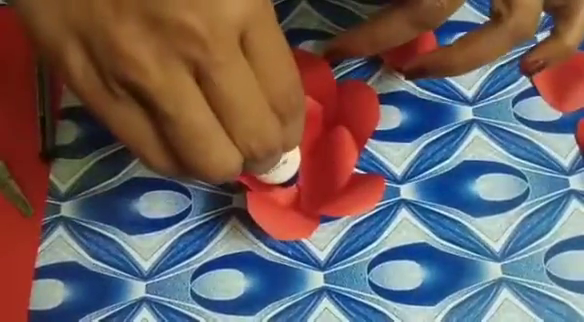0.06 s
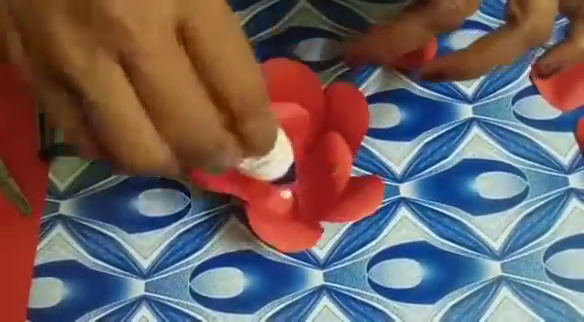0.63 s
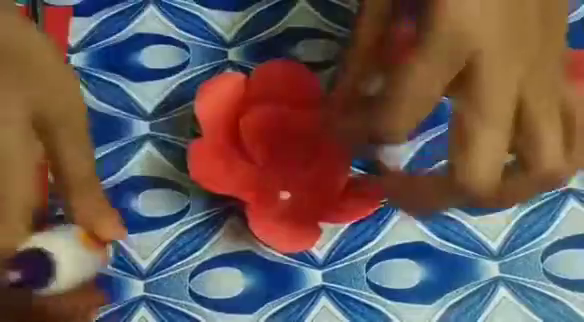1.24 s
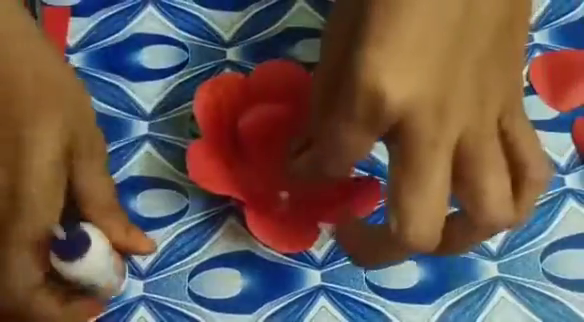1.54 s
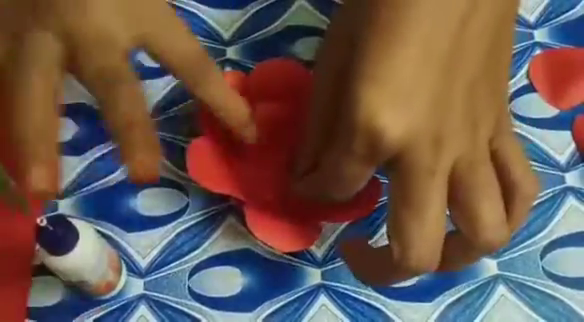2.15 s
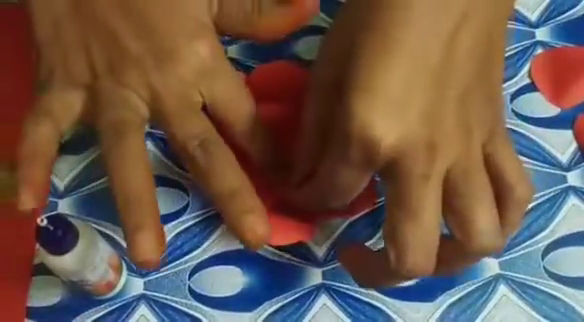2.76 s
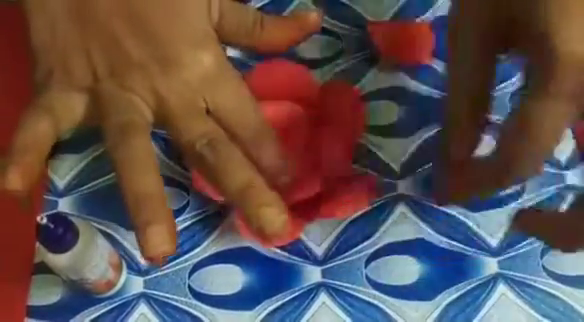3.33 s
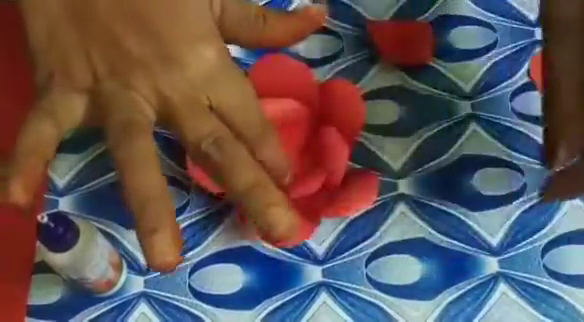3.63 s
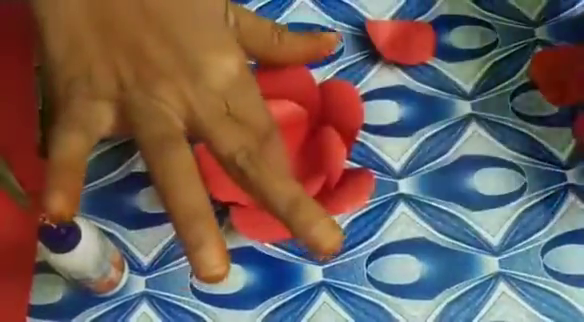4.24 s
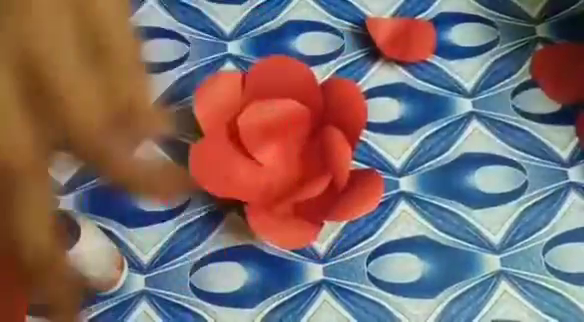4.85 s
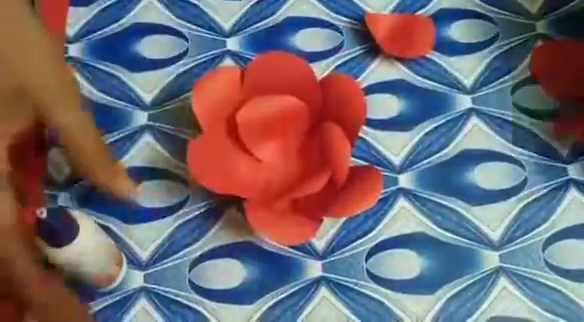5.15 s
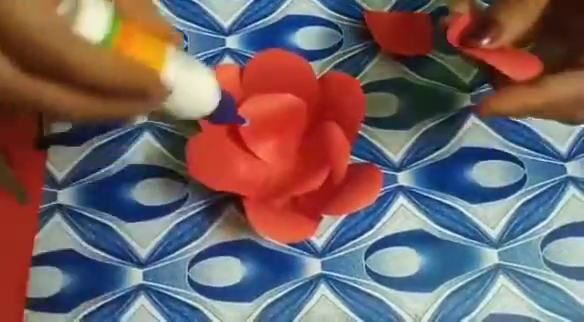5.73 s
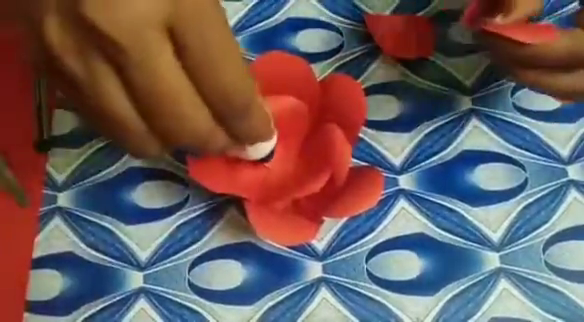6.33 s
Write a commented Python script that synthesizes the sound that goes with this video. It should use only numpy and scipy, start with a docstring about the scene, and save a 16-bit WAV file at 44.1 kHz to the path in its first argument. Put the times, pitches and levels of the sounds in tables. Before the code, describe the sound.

A fan hums and a muffled engine outside swells and fades beneath quiet, close paper handling in a small room. A few crisp ticks come first, then a plastic glue bottle lands on the table with a short, hollow knock. Soft fingertip hiss and scattered crackles follow, with one sharper paper snap midway. Near the end the bottle gives a faint scrape and bump, and the paper crackles again.

```python
"""Paper ticks, slides and flicks as hands glue petals into a flower on a cloth-covered table.
Friction makes the swishes and hiss; creases snap as they give way. A plastic glue bottle is stood
down, ringing the modes of the table top, and later scrapes as it is picked up. A fan hums in the
small room, and an engine far outside throbs through the walls as its throttle opens and shuts."""
import sys
import numpy as np
from scipy import signal
from scipy.fft import rfft, irfft, next_fast_len
from scipy.io import wavfile
from scipy.ndimage import uniform_filter1d, map_coordinates

SR = 44100
rng = np.random.default_rng(int(sys.argv[2]) if len(sys.argv) > 2 else 0)


def log_audio(samples):
    """Write samples as a 16-bit WAV file to the path given in sys.argv[1]."""
    # one column per channel
    frames = np.atleast_2d(samples).T
    # limit to full scale, then quantise
    limited = np.clip(frames, -1, 1)
    pcm = np.round(limited * 32767).astype(np.int16)
    wavfile.write(sys.argv[1], SR, pcm)


N = 281799

SLIP_ATTACK = 0.38  # share of a slip's length spent rising


def paper(swish_db=-3, settle_db=-10.5, settle_s=0.081, tick_t60_s=0.013, snap_low_hz=1800, wet_db=-18):
    """Stick-slip friction and buckling: paper swishes, the landing bottle scuffs and creases snap."""
    # short swishes of paper, and one dull scuff as the bottle lands:
    # start_s, length_s, level_db, tilt_db_per_octave
    swishes = [(0.343, 0.06, -54, 2), (0.396, 0.052, -41, 1.5), (0.53, 0.038, -42, 3),
               (0.567, 0.0086, -36, 1), (0.585, 0.006, -23.5, 2), (0.592, 0.025, -38, 0),
               (0.631, 0.028, -33.5, 1), (1.05, 0.016, -38.5, 0), (1.187, 0.03, -43, 6),
               (1.588, 0.015, -41, -8.5), (2.872, 0.14, -39.5, -1.5), (3.021, 0.041, -30, 2),
               (3.048, 0.028, -22.5, -.5), (3.063, 0.0091, -16.5, -1), (3.594, 0.016, -25.5, 6.5),
               (3.759, 0.025, -32.5, 2), (3.779, 0.029, -25, 1.5), (3.824, 0.052, -40, -0.5),
               (4.105, 0.0089, -37, -1), (4.667, 0.024, -29.5, 1.5), (5.191, 0.012, -40, 15),
               (5.274, 0.035, -36.5, 9), (5.416, 0.035, -39.5, 5), (5.464, 0.031, -35, 5),
               (5.851, 0.035, -24, 2.5), (5.884, 0.033, -24.5, 0.5), (5.934, 0.051, -37.5, 4)]
    # creases snapping and nails touching: start_s, level_db, tilt_db_per_octave
    ticks = [(0.25, -37, -1), (0.439, -29, -1.5), (0.4475, -28.5, -3), (.5868, -16, -1), (.5898, -14, 0),
             (0.633, -29, 4), (0.648, -26, 4), (0.7835, -35, -1.5), (.8062, -37, 0), (1.5846, -25.5, -7.5),
             (2.927, -31, -3), (3.0665, -21, -8), (3.0686, -23.5, -7), (3.401, -34, -2), (3.457, -30.5, 12),
             (3.774, -27, -1), (3.8893, -30.5, -1), (4.5186, -33, 0), (4.655, -20, 6.5), (4.682, -23.5, 0),
             (5.1878, -41, 12), (5.8503, -16, 3), (5.903, -20, 12), (5.917, -37, 9)]
    # spectrum of the paper: frequency_hz, left_db, right_db
    spectrum = [(250, -28, -40), (710, -13, -13.5), (1060, -9, -22.5), (1880, -13.5, -17),
                (2620, -20, -5.5), (3420, -5.5, -12), (3950, -3.5, -11.5), (5080, -14, -19.5),
                (5880, -9, -14), (7450, 3.5, -7), (8230, -1.5, 1), (10600, -7.5, -12.5), (11300, -3, -26),
                (12800, -3.5, -25), (14400, 2.5, -25), (14900, -3.5, -21), (15900, 2, -32)]
    t, close = np.arange(SR) / SR, np.zeros((2, N))
    for start, length, db, tilt in swishes:
        push = envelope(t, length, SLIP_ATTACK * length, release=length)
        settle = amp(settle_db) * envelope(t, length, SLIP_ATTACK * length, settle_s)
        gain = amp(db + swish_db) * np.maximum(push, settle)
        fibres = friction(tilt, grain_db=0.3, grains_per_s=810)
        slip = gain * fibres * crinkle(jump_db=4, creases_per_s=260, life_s=0.0013)
        add(close, start, scattered(slip, share=0.55, spread_s=0.00095))
    # stiff paper radiates little bass when it snaps
    highpass = signal.butter(2, snap_low_hz, 'highpass', fs=SR, output='sos')
    for start, db, tilt in ticks:
        fibres = friction(tilt, grain_db=0.5, grains_per_s=450)
        snap = signal.sosfilt(highpass, decay(t, db, tick_t60_s) * fibres)
        add(close, start, snap * amp([[0], [-5]]))  # the snaps face left
    return coloured(close + amp(wet_db) * reverb(close, channels=2), spectrum)


def rasping():
    """Stick-slip friction: cut edges catch on the paper's grain with a dry midrange crackle."""
    # one petal dragging over another: start_s, length_s, level_db
    rasps = [(0.429, 0.021, -54), (0.599, 0.057, -53), (2.928, 0.04, -48), (3.043, 0.012, -41),
             (3.596, 0.015, -45.5), (3.77, 0.043, -44.5), (4.667, 0.016, -48)]
    # spectrum of the rasp: frequency_hz, left_db, right_db
    spectrum = [(900, -28, -25), (1700, -13, 3), (2800, -4, -5), (4240, 8, -4), (5200, -6, 2),
                (5700, 1, -3), (7000, -22, -24)]
    t, gain = np.arange(SR) / SR, np.zeros(N)
    for start, length, db in rasps:
        drag = amp(db) * envelope(t, length, SLIP_ATTACK * length, release=0.086)
        add(gain, start, drag * crinkle(jump_db=7, creases_per_s=420, life_s=0.00057))
    return coloured(gain * rng.standard_normal((2, N)), spectrum)


def petal_spring(attack_s=0.0018, click_t60_s=0.0033):
    """Snap-through: a pressed, curved petal pops back with a click and rings briefly in its modes."""
    # the petal springing free: start_s, level_db
    pops = [(3.0665, -21.5)]
    # modes of the petal: pitch_hz, level_db, t60_s
    modes = [(3600, -1.5, 0.069), (4430, 5.5, 0.045), (7700, -18, 0.036), (8950, 4, 0.031),
             (12000, 2, 0.028)]
    t, track = np.arange(SR // 5) / SR, np.zeros((2, N))
    for start, db in pops:
        ring = sum(decay(t, level, t60) * np.sin(2 * np.pi * (hz * t + rng.random((2, 1))))
                   for hz, level, t60 in modes)
        click = decay(t, -20, click_t60_s) * rng.standard_normal((2, len(t)))
        add(track, start, amp(db) * (ring * (1 - np.exp(-t / attack_s)) + click))
    return track * amp([[0], [-9]])


def sliding(slide_db=3, catch_db=0.9, resting_db=-74, swell_db=4.5):
    """Sliding friction: fingertips hiss and catch on the petals, pressing harder through each stroke."""
    # fingertip strokes: start_s, length_s, end_level_db
    strokes = [(0.475, 0.21, -57), (1.206, .22, -56.5), (2.146, 0.64, -54.5), (2.787, 0.29, -48.5),
               (3.352, 0.12, -54), (4.04, 0.65, -55), (4.91, 0.14, -54.5), (5.15, 0.1, -53),
               (5.386, 0.31, -51), (6.22, .17, -67)]
    # spectrum of skin on paper: frequency_hz, left_db, right_db
    spectrum = [(1000, -35, -34), (2500, -9.5, -19), (4220, -3.5, -29), (4960, -24, -33), (7170, 2, -4.5),
                (8350, 1, 0), (10400, -4, -9.5), (11900, 0, -47), (15200, 3, -24), (15800, -15, -24)]
    t, gain = np.arange(N) / SR, amp(resting_db)
    for start, length, db in strokes:
        remaining = np.clip(1 - (t - start) / length, 0, 1)
        contact = envelope(t - start, length, attack=0.4 * length, release=0.14)
        gain = gain + amp(db - swell_db * remaining) * contact
    skin = patchy(drift_db=2.0)
    seconds = [crinkle(jump_db=0, creases_per_s=120, life_s=0.0007) for _ in range(N // SR + 1)]
    crackle = np.concatenate(seconds)[:N]
    catching = amp(slide_db + catch_db * (wobble(14) + wobble(60)))
    return gain * catching * coloured(crackle * skin, spectrum)


def knocks(contact_s=0.0004, clunk_db=-22, clunk_t60_s=0.2, wet_db=-16, wide_db=-26):
    """Impact excites damped modes: the bottle's foot clacks, the table rings and the walls reflect it."""
    # bottle and hands meeting the table: start_s, level_db
    blows = [(1.5842, -10), (3.034, -34), (3.0661, -40), (4.691, -41), (5.345, -31.5)]
    # modes of the table top: pitch_hz, level_db, t60_s
    table_modes = [(188.5, -15.5, 0.41), (240.7, -0.5, 0.11), (276.3, -9, 0.27), (286, -31, 0.23),
                   (310, -4, 0.15), (351, -26, 0.2), (450, -36, 0.27), (523, -21.5, 0.11), (584, -37, 0.21),
                   (713, -34, 0.096), (846, -38, 0.14)]
    # modes of the hollow plastic foot: pitch_hz, level_db, t60_s
    foot_modes = [(564, -6.5, 0.009), (970, -17.5, 0.0094), (1340, -21, 0.0083)]
    # dense, short-lived modes of bottle and table: frequency_hz, level_db
    dense_modes = [(120, -30), (200, 10), (300, -13), (420, 3.5), (700, -5), (950, -14), (1450, -18),
                   (1900, -45), (5000, -39)]
    # reflections from nearby walls: delay_s, level_db
    walls = [(0.0771, -19), (0.111, -19), (0.153, -26)]
    t, direct = np.arange(SR // 2) / SR, np.zeros(N)
    cushion = 1 - np.exp(-t / contact_s)  # the cloth softens the contact
    # neighbouring modes swing in opposite senses
    ring = sum((-1) ** k * decay(t, db, t60) * np.sin(2 * np.pi * hz * t)
               for k, (hz, db, t60) in enumerate(table_modes))
    clack = sum(decay(t, db, t60) * np.sin(2 * np.pi * hz * t) for hz, db, t60 in foot_modes)
    for start, db in blows:
        noise = coloured(rng.standard_normal(N), dense_modes)[0, :len(t)]
        clunk = decay(t, clunk_db, clunk_t60_s) * noise
        add(direct, start, amp(db) * (ring + clack + clunk) * cushion)
    reflections = lambda hz: sum(amp(db) * np.exp(-2j * np.pi * hz * delay) for delay, db in walls)
    room = amp(wet_db) * reverb(direct, channels=1) + amp(wide_db) * reverb(direct, channels=2)
    return direct + filtered(direct, reflections) + room


def bottle_scrape():
    """Resonance: as the bottle is gripped its foot drags, and the friction noise sounds its shell."""
    # strength of the drag: time_s, level_db
    drag = [(5.16, -98), (5.19, -47), (5.205, -57), (5.23, -58), (5.28, -90.5)]
    # resonances of the hollow shell: centre_hz, half_width_hz, level_db
    resonances = [(764, 75, -2), (3950, 75, -8)]
    shell = lambda hz: sum(amp(db) / (1 + ((hz - centre) / width) ** 2)
                           for centre, width, db in resonances)
    return amp(curve(drag)) * unit(filtered(rng.standard_normal((2, N)), shell))


def leaning():
    """Forced vibration: the table rumbles dully as a hand comes to rest on it."""
    # the hand's weight bearing down: start_s, length_s, level_db
    leans = [(1.286, 0.38, -45.5)]
    # the table's deep response: frequency_hz, level_db
    spectrum = [(25, -34), (48, -20), (63, -5), (80, 3), (110, -10), (250, -70)]
    t = np.arange(N) / SR
    gain = sum(amp(db) * envelope(t - start, length, attack=0.048, release=0.099)
               for start, length, db in leans)
    return gain * coloured(rng.standard_normal(N), spectrum)


def brushing(uneven_db=4.0):
    """Friction noise: a soft rush swells as the arms move over the cloth."""
    # strength of the brushing: time_s, level_db
    movement = [(0, -80), (.45, -78), (.85, -63), (1.4, -54.5), (1.95, -60.5), (2.4, -56), (2.95, -55),
                (3.5, -55), (4.25, -66.5), (4.6, -54), (5.1, -64), (5.55, -55.5), (6.15, -66),
                (6.39, -56.5)]
    # spectrum of rubbed cloth: frequency_hz, left_db, right_db
    spectrum = [(400, -20, -6), (880, -0.5, -3), (1500, 2, -1.5), (2700, -0.5, 1), (4000, 3, -10),
                (4480, -0.5, -8), (4770, -23.5, -22), (6240, -7, -5), (7950, -10, -16), (11000, -32, -33)]
    rush = scattered(patchy(drift_db=2.5), share=0.8, spread_s=0.008)
    return amp(curve(movement) + uneven_db * wobble(14)) * coloured(rush, spectrum)


def squeak(pitch_hz=3868, waver_hz=14):
    """Periodic stick-slip: skin on the smooth cloth gives one thin, wavering tone."""
    # strength of the squeak as the hand moves in: time_s, level_db
    levels = [(1.07, -85), (1.11, -54), (1.15, -68), (1.18, -52), (1.24, -62), (1.3, -56.5), (1.34, -69),
              (1.55, -78)]
    phase = 2 * np.pi * np.cumsum(pitch_hz + waver_hz * wobble(70)) / SR
    return amp(curve(levels)) * np.sqrt(2) * np.sin(phase) * amp([[2], [-8]])


def engine(tone_db=-1, rough_db=-8, unsteady_db=1, falter_db=2.0):
    """Transmission loss: walls pass only the low exhaust harmonics and boom of a revving engine."""
    # engine speed: time_s, firing_rate_hz
    speed = [(0, 35), (.85, 33.5), (1, 37), (1.4, 40), (2.2, 41), (2.9, 38.5), (3.5, 36), (3.8, 35.5),
             (4.2, 37), (4.55, 34), (6.39, 33)]
    # the engine between revs: time_s, level_db
    idle = [(0, -55), (.3, -52), (.6, -44.5), (1.6, -58), (1.9, -67), (2.45, -76), (2.6, -43), (3, -45),
            (5.4, -45.5), (5.8, -52.5), (6.39, -42)]
    # throttle openings: start_s, length_s, level_db
    throttle = [(0.016, 0.022, -40.5), (0.323, 0.024, -40.5), (0.447, 0.05, -42), (0.773, 0.38, -36),
                (1.39, 0.083, -37.5), (1.687, 0.049, -40), (2.044, 0.23, -46.5), (2.675, 0.15, -35.5),
                (2.92, 0.34, -36.5), (3.648, 0.17, -36.5), (4.04, 0.325, -37), (4.452, 0.14, -34),
                (4.818, 0.14, -37.5), (5.135, 0.1, -29.5), (5.465, 0.11, -34), (5.953, 0.23, -42.5)]
    # spectrum that passes the walls: frequency_hz, level_db
    spectrum = [(22, -40), (48, -2), (66, -13), (80, -2), (101, 8), (114, 11.5), (124, 8.5), (135, 9),
                (152, 2), (170, -7.5), (300, -58)]
    t, firing_hz = np.arange(N) / SR, curve(speed)
    firings = np.cumsum(firing_hz) / SR
    revs = [amp(db) * envelope(t - start, length, attack=0.018, release=0.13)
            for start, length, db in throttle]
    falter = amp(falter_db * (1 - 3.65 * np.tanh(wobble(15) ** 2)))  # brief random dips in level
    effort = np.max(revs + [amp(curve(idle))], axis=0) * falter
    harmonics = 0
    for k in range(2, 6):
        gain = amp(along(spectrum, k * firing_hz)[0] + unsteady_db * wobble(10))
        harmonics += gain * np.sin(2 * np.pi * (k * firings + rng.random()))
    boom = coloured(rng.standard_normal(N), spectrum)
    return effort * (amp(tone_db) * unit(harmonics) + amp(rough_db) * boom)


def fan_and_background(hiss_db=-51, rumble_db=-52, wide_db=-16, waver_db=3.5):
    """Motor vibration: the fan's wavering mains hum, over an uneven background rumble and a soft hiss."""
    # partials of the motor: pitch_hz, level_db
    partials = [(100, -62.5), (199.5, -56.5), (300, -49.5)]
    # the room's low murmur: frequency_hz, level_db
    rumble_spectrum = [(20, -29), (45, -32), (75, -2), (130, -1.5), (220, -6.5), (320, -1), (400, -12.5),
                       (520, -31.5), (900, -62)]
    # steady background hiss, with a deep gap near 5 kHz: frequency_hz, left_db, right_db
    hiss_spectrum = [(120, -12, -12), (332, 0, 5.5), (560, -2, -4.5), (690, -3, -1.5), (890, -5, -1.5),
                     (970, -3, -5.5), (2190, -2.5, -1), (2380, 1.5, 4.5), (2980, -1, 2.5), (3380, -6, -5.5),
                     (3780, -0.5, -19), (4736, -4, -9.5), (4900, -54, -57), (5590, -15, -10),
                     (6090, -16.5, -32), (7320, 5.5, -9), (8370, 0, 0.5), (9400, -6, -15),
                     (10500, -10.5, -28), (15400, -18, -35)]
    # the background rumble and hiss slowly rising and falling: time_s, level_db
    background_level = [(0, -2.5), (.42, -3), (.85, 0.7), (1.9, 1), (3.3, -0.5), (4, -0.3), (5.6, -1),
                        (6.39, -1)]
    t = np.arange(N) / SR
    hum = sum(np.sqrt(2) * amp(db + waver_db * wobble(6))
              * np.sin(2 * np.pi * hz * t + 0.04 * wobble(7.3)) for hz, db in partials)
    murmur = rng.standard_normal(N) + amp(wide_db) * rng.standard_normal((2, N))
    rumble = coloured(murmur, rumble_spectrum) * amp(rumble_db + 1.5 * wobble(9))
    noise = scattered(patchy(drift_db=1.8), share=0.8, spread_s=0.012)
    hiss = amp(hiss_db) * coloured(noise, hiss_spectrum)
    return hum + amp(curve(background_level)) * (rumble + hiss)


def fan_whine():
    """Narrowband noise is heard as pitch: the fan's hollow note and faint, fluttering whine."""
    # Gaussian bands of noise: centre_hz, width_hz, level_db
    bands = [(800, 45, -69), (3280, 9, -68)]
    whine = np.zeros((2, N))
    for centre, width, db in bands:
        band = lambda hz: np.exp(-0.5 * ((hz - centre) / width) ** 2)
        whine += amp(db) * unit(filtered(rng.standard_normal((2, N)), band))
    return whine * amp([[-2], [2]])


def reverb(x, channels, build_s=0.049):
    """Reverberation: a diffuse tail builds up, then is absorbed fastest in the treble."""
    # the room's decay times: frequency_hz, t60_s
    decay_times = [(150, 0.26), (300, 0.45), (1000, 0.39), (4000, 0.35), (12000, 0.04)]
    hz, t, bands = signal.stft(rng.standard_normal((channels, SR // 2)), SR, nperseg=256)
    bands = bands * decay(t, 0, along(decay_times, hz).T) * (1 - np.exp(-t / build_s))
    tail = signal.istft(bands, SR, nperseg=256)[1]
    return signal.fftconvolve(np.atleast_2d(x), tail / np.linalg.norm(tail[0]), axes=1)[:, :N]


def scattered(x, share, spread_s):
    """Interference: weak copies from close surfaces ripple the spectrum, differently left and right."""
    t = np.arange(SR // 30) / SR
    copies = rng.standard_normal((2, len(t))) * np.exp(-t / spread_s)
    copies *= share / np.linalg.norm(copies, axis=1, keepdims=True)
    copies[:, 0] = 1  # the direct path
    return signal.fftconvolve(x, copies, axes=1)[:, :x.shape[1]] / np.hypot(1, share)


def friction(tilt, grain_db, grains_per_s):
    """Stick-slip of fibres: a second of grainy noise, tilted in dB per octave."""
    hz = np.fft.rfftfreq(SR, 1 / SR)
    octaves = np.log2(np.maximum(hz, 700) / 8000)
    noise = irfft(rfft(rng.standard_normal((2, SR))) * amp(tilt * octaves), SR)
    grains = map_coordinates(rng.standard_normal(SR // 8), [np.arange(SR) * grains_per_s / SR], order=1)
    return noise * unit(amp(grain_db * grains))


def crinkle(jump_db, creases_per_s, life_s):
    """Random buckling: a second of gain that jumps and relaxes each time a tiny crease gives way."""
    creases = (rng.random(SR) < creases_per_s / SR) * rng.uniform(0.3, 1, SR)
    jumps = signal.lfilter([1], [1, -np.exp(-1 / (life_s * SR))], creases)
    return unit(1 + amp(jump_db) * jumps)


def patchy(drift_db):
    """Random modulation: stereo noise whose bands drift separately in level."""
    bands = signal.stft(rng.standard_normal((2, N)), nperseg=1024)[2]
    drift = uniform_filter1d(rng.standard_normal(bands.shape[1:]), size=3, axis=0)  # across frequency
    drift = uniform_filter1d(drift, size=9, axis=1)  # across time
    return unit(signal.istft(bands * amp(drift_db * unit(drift)))[1][:, :N])


def envelope(t, length, attack, release):
    """Gain that rises from t = 0, holds until length, then falls 20 dB per release; all in seconds."""
    return np.clip(t / attack, 0, 1) * amp(-20 * np.maximum(0, t - length) / release)


def decay(t, db, t60):
    """Exponential damping: gain that starts at db and falls 60 dB in t60 seconds."""
    return amp(db - 60 * t / t60)


def amp(db):
    """Decibels to gain."""
    return 10 ** (np.asarray(db) / 20)


def unit(x):
    """Scale to rms 1."""
    return x / np.sqrt(np.mean(x ** 2) + 1e-20)


def along(points, hz):
    """Interpolate each column of a table on a log frequency axis."""
    knots_hz, *columns = np.transpose(points)
    return np.array([np.interp(np.log(hz + 1), np.log(knots_hz), column) for column in columns])


def curve(rows):
    """Interpolate (time_s, value) rows at every sample."""
    return np.interp(np.arange(N) / SR, *np.transpose(rows))


def wobble(rate):
    """A smooth random curve, rate knots a second."""
    return map_coordinates(rng.standard_normal(int(N * rate / SR) + 4), [np.arange(N) * rate / SR])


def filtered(x, response):
    """Multiply the spectrum of x by a frequency response."""
    size = next_fast_len(N + SR // 2)
    return irfft(rfft(x, size) * response(np.fft.rfftfreq(size, 1 / SR)), size)[..., :N]


def coloured(x, spectrum):
    """Shape a white sound, keeping its power."""
    return filtered(x, lambda hz: unit(amp(along(spectrum, hz))))


def add(track, start_s, sound):
    """Mix a sound in at start_s."""
    part = track[..., round(start_s * SR):][..., :sound.shape[-1]]
    part += sound[..., :part.shape[-1]]


def scene():
    """Superposition: the handwork adds to the engine, the fan and the background."""
    petals = paper() + rasping() + petal_spring() + sliding()
    table = brushing() + squeak() + bottle_scrape() + knocks() + leaning()
    return petals + table + engine() + fan_and_background() + fan_whine()


def record(dry, top_hz=15600):
    """Band limiting: an ideal low-pass filter removes everything above top_hz."""
    return filtered(dry, lambda hz: hz < top_hz)


dry = scene()
out = record(dry)
log_audio(out)
```